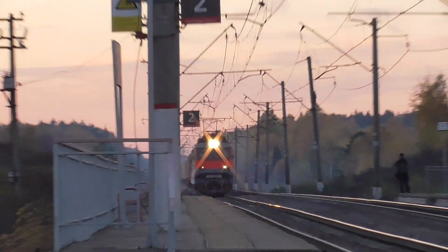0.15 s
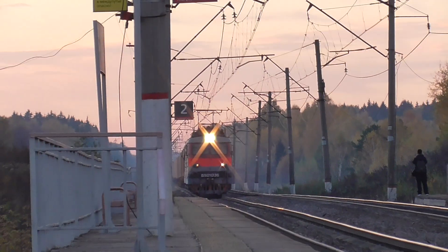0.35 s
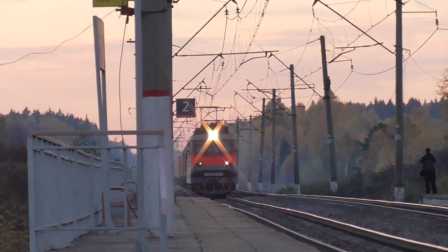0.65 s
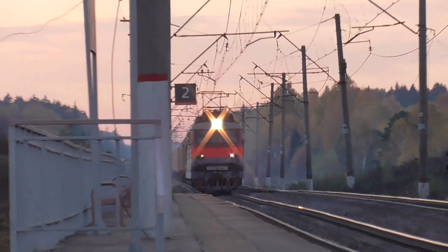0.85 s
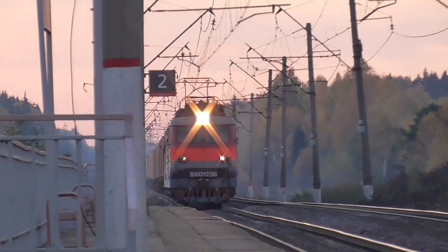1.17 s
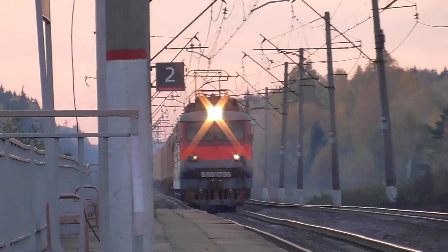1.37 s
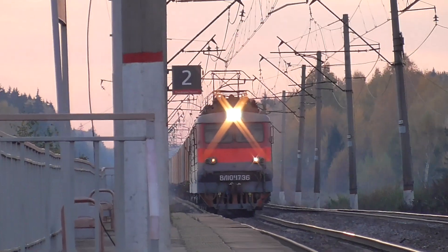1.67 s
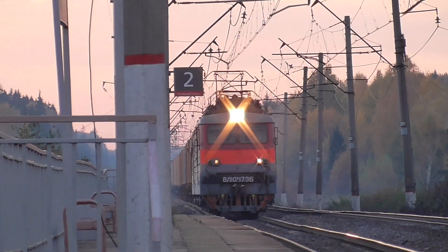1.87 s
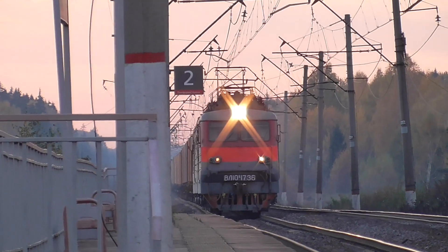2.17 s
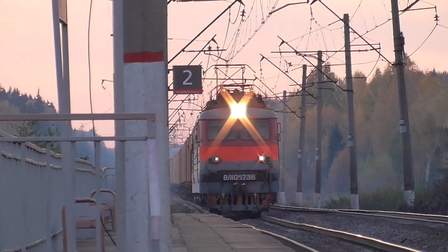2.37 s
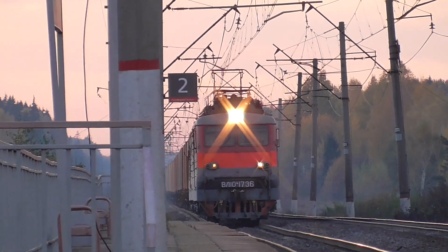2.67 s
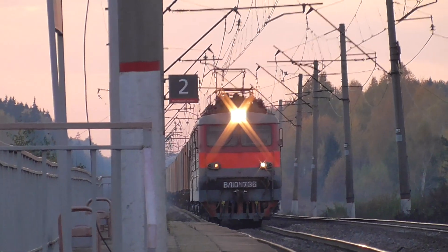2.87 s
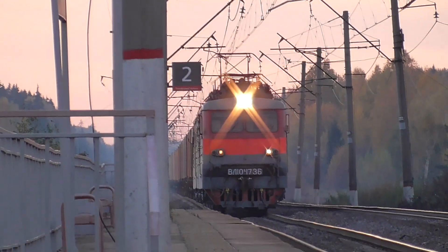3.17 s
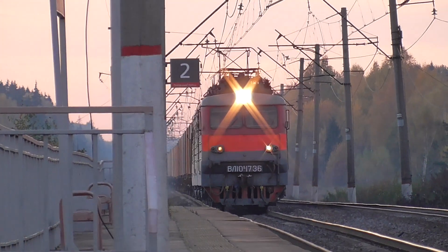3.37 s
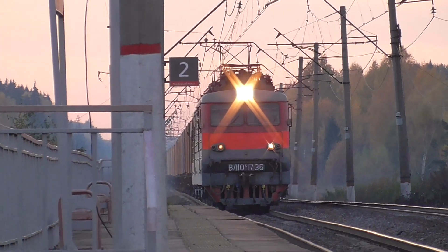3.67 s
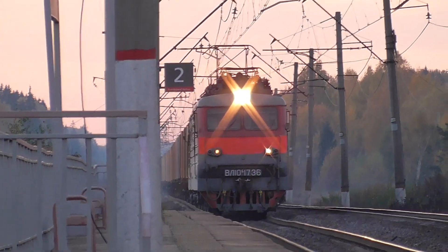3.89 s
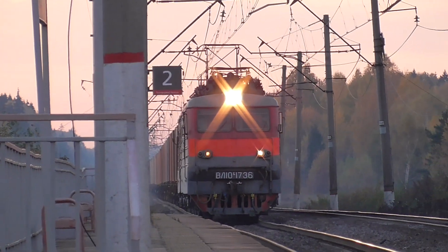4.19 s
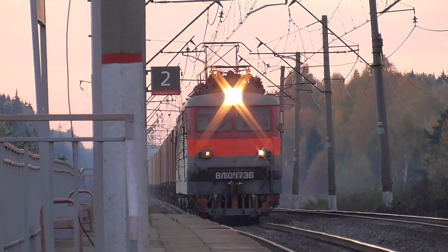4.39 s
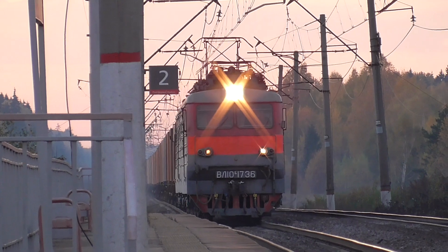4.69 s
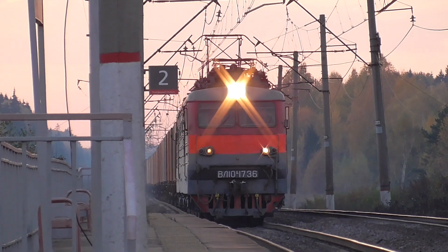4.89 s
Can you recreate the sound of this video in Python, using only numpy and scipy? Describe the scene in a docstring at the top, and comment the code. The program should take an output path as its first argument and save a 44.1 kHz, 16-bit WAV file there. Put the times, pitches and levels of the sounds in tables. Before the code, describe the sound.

An electric freight train rumbles far off in a wooded valley while, right at the microphone, a camera's motors faintly whine, tick and sizzle. After about two seconds the approaching locomotive sounds a loud high air horn, joined a moment later by a lower one. Both hold, wavering, with rough echoes from the trees. Near the end the high horn drops to a weak tail and the low one sags slightly.

```python
"""An electric freight train rumbles far off in a wooded valley, while close by a camera's motors whine,
tick and sizzle. After two seconds the approaching locomotive sounds its high air horn, then its low one:
in each, compressed air drives a diaphragm that radiates a harmonic series. Trees that the train has passed
return the horns late and at a lower Doppler pitch, which hangs a rough band under every partial.
Near the end the valve is let go: the high horn drops to a weak tail, the low one sags and dulls."""
import sys
import numpy as np
from scipy import signal
from scipy.fft import rfft, irfft, next_fast_len
from scipy.io import wavfile
from scipy.ndimage import uniform_filter1d

SR = 44100
rng = np.random.default_rng(int(sys.argv[2]) if len(sys.argv) > 2 else 0)


def generate_wav(signal):
    """Clip the signal to [-1, 1] and save it as 16-bit WAV at the path in sys.argv[1]."""
    frames = np.transpose(np.atleast_2d(signal))
    scaled = np.clip(frames, -1, 1) * 32767
    pcm = np.round(scaled).astype(np.int16)
    wavfile.write(sys.argv[1], SR, pcm)


N = 222043
TIME = np.arange(N) / SR
TRAIN_M_PER_S, SOUND_M_PER_S, START_RANGE_M = 21.5, 335, 200
HIGH_ON_S, LOW_ON_S, MID_BLAST_S, VALVE_OFF_S = 2.157, 2.475, 3.4, 4.58
CYCLE_S = .2833   # period of the camera mechanism


def from_db(db):
    """Decibels to amplitude ratio."""
    return 10 ** (np.asarray(db) / 20)


def unit_rms(x):
    """Normalisation to unit power."""
    return x / np.sqrt(np.mean(x ** 2) + 1e-20)


def since(s):
    """Seconds elapsed since a moment; zero before it."""
    return np.maximum(TIME - s, 0)


def rise(s, length_s):
    """A linear ramp from 0 to 1 that starts at s."""
    return np.minimum(since(s) / length_s, 1)


def pulse(s, width_s, clock=TIME):
    """A Gaussian pulse centred on s."""
    return np.exp(-.5 * ((clock - s) / width_s) ** 2)


def phase_of(hz):
    """Phase is the time integral of frequency."""
    return 2 * np.pi * np.cumsum(hz) / SR


def drift(hz):
    """A random fluctuation of unit rms, low-passed at hz."""
    pole = np.exp(-200 * np.pi * hz / SR)
    white = rng.standard_normal(N // 100 + 1002)
    slow = signal.lfilter([1], [1, -2 * pole, pole * pole], white)[1000:]
    return np.interp(np.arange(N) / 100, np.arange(len(slow)), unit_rms(slow))


def noise(spectrum):
    """Spectral shaping: noise of unit rms that falls 12 dB an octave beyond the given points."""
    hz, db = np.transpose(spectrum)
    size = 2 * next_fast_len(N // 2 + 1)
    bins = np.maximum(np.arange(size // 2 + 1) * SR / size, 1)
    colour = from_db(np.interp(np.log(bins), np.log(hz), db))
    skirts = np.minimum(1, bins / hz[0]) ** 2 * np.minimum(1, hz[-1] / bins) ** 2
    return unit_rms(irfft(rfft(rng.standard_normal(size)) * colour * skirts, size)[:N])


def partials(phase, harmonics, flutter_db):
    """A harmonic series in which air turbulence modulates each partial independently."""
    return sum(from_db(db + flutter_db * drift(13.7)) * np.sin(k * phase) for k, db in harmonics)


# Rolling noise spectrum. Each row: frequency in Hz, relative density in dB.
ROLLING_SPECTRUM = [(15, -49), (25, -10), (63, -9.5), (157, 2), (366, -8), (477, -3.5), (727, -15),
                    (1260, -15.5), (1760, -28.5), (2630, -28.5), (2810, -35), (3430, -28), (3670, -38.5),
                    (4380, -42.5), (5000, -51), (6500, -99.5), (11000, -120)]
# Its envelope. Each row: time in seconds, level in dB.
ROLLING_LEVELS = [(0, -39.5), (.6, -39.5), (1.3, -41), (2.15, -40), (2.4, -42), (3.6, -43), (4.7, -42),
                  (5.03, -37.5)]
# Low drones. Each row: centre and length in seconds, centre pitch in Hz, glide in Hz/s, level in dB.
ROLLING_DRONES = [(0.586, 0.16, 102, 1.5, -43), (1.367, 0.48, 94, 17, -42.5), (3.718, 1.7, 102, 19, -43.5),
                  (5.0, 0.94, 98, -27.5, -39)]
def rolling():
    """Rolling noise: distant wheels and wagons radiate a broad rumble, and low drones glide through it."""
    level_db = np.interp(TIME, *np.transpose(ROLLING_LEVELS))
    out = from_db(level_db + .44 * drift(3.8)) * noise(ROLLING_SPECTRUM)
    for s, length_s, hz, glide, db in ROLLING_DRONES:
        swell = np.cos(np.pi * np.clip((TIME - s) / length_s, -.5, .5))
        gain = from_db(db + 1.5 * drift(1.8)) * swell
        out += gain * np.sin(phase_of(hz + glide * (TIME - s) + drift(13)))
    return out


# Motor tones. Each row: frequency in Hz, level in dB, depth of the dip from 0 to 1.
MOTOR_TONES = [(3363, -51.5, .25), (4220, -61, .85), (6762, -66.5, .95), (7620, -71.5, .3),
               (9365, -69.5, .9), (9698, -76, .6)]
def motor_whine():
    """Amplitude modulation: the camera motor's tones dip once a cycle and swell once in three."""
    dip = pulse(.047, .013, TIME % CYCLE_S)
    swell_db = -3 * np.cos(2 * np.pi * TIME / (3 * CYCLE_S))
    out = np.zeros(N)
    for hz, db, depth in MOTOR_TONES:
        phase = phase_of(hz * (1 + .0012 * drift(46)))
        out += from_db(db + (1 - depth) * swell_db + drift(5)) * (1 - depth * dip) * np.sin(phase)
    return out


# Rattle spectrum. Each row: frequency in Hz, relative density in dB.
RATTLE_SPECTRUM = [(7900, -28), (8300, 8), (8600, -13), (9200, 3), (9350, 11), (9520, -6), (9750, 11.5),
                   (9900, -29.5)]
def rattle():
    """Modulated band noise: the camera mechanism rattles faintly, four throbs to a cycle."""
    throb = 1 + .8 * np.cos(8 * np.pi * TIME / CYCLE_S)
    return from_db(-73) * throb * noise(RATTLE_SPECTRUM)


# Zoom drive spectrum. Each row: frequency in Hz, relative density in dB.
ZOOM_SPECTRUM = [(3000, -3), (6000, -5), (12000, -7)]
def zoom_rustle():
    """Broadband machine noise: the zoom drive rustles briefly and stops."""
    return from_db(-68.5) * (1 - rise(.29, .05)) * noise(ZOOM_SPECTRUM)


# Hiss spectrum. Each row: frequency in Hz, relative density in dB.
HISS_SPECTRUM = [(3000, -3.5), (6000, -6.5), (7700, -0.5), (9300, 2), (10200, -4), (12000, -7.5),
                 (13000, 3.5), (15800, -4)]
def hiss():
    """Stationary noise: the microphone's own hiss."""
    return from_db(-66.5) * noise(HISS_SPECTRUM)


# Mechanism ticks. Each row: time within the cycle in seconds, peak level in dB.
CYCLE_TICKS = [(0.012, -53.5), (0.095, -53.5), (0.164, -65.5), (0.247, -56.5)]
def ticks():
    """Resonance: the camera mechanism rings briefly at one pitch with every tick."""
    envelope = sum(from_db(db) * pulse(s, .004, TIME % CYCLE_S) for s, db in CYCLE_TICKS)
    return envelope * np.sin(2 * np.pi * 2605 * TIME)


# Lens motor runs. Each row: start in seconds, end in seconds, relative level in dB.
LENS_BURSTS = [(0.636, .71, -55), (1.652, 1.86, -49.5), (1.94, 2.067, -52), (2.884, 2.92, -52),
               (2.955, 3.334, -49), (4.08, 4.27, -46), (4.277, 4.38, -50)]
# Their spectrum. Each row: frequency in Hz, relative density in dB.
LENS_SPECTRUM = [(10000, -45), (11800, -26.5), (12800, -4.5), (14000, -6), (14700, 0), (15800, -4)]
def lens_sizzle():
    """Gated noise: the lens motor sizzles unevenly while it runs."""
    gate = sum(from_db(db) * ((TIME > start) & (TIME < end)) for start, end, db in LENS_BURSTS)
    return uniform_filter1d(gate, size=1400) * from_db(1.8 * drift(70) - 3.5) * noise(LENS_SPECTRUM)


# Small clicks close by. Each row: start in seconds, level in dB, centre frequency in Hz.
NEAR_CLICKS = [(.777, -56, 4300), (3.372, -66, 11000)]
def clicks(decay_s=.0049):
    """Damped transients: each click is a narrow band of noise that decays exponentially."""
    out = np.zeros(N)
    for s, db, hz in NEAR_CLICKS:
        band = signal.butter(2, [hz * .87, hz * 1.15], "band", fs=SR, output="sos")
        envelope = (TIME > s) * np.exp(-since(s) / decay_s)
        out += from_db(db) * envelope * unit_rms(signal.sosfilt(band, rng.standard_normal(N)))
    return out


# Reflections of the high horn. Each row: harmonic number, first swell in seconds, beat rate in Hz,
# slowing in Hz/s, amplitude as a share of the direct sound.
HORN_REFLECTIONS = [(1, 2.24, 2.7, .45, .55), (1, 2.23, 6.4, 1.4, .42), (2, 2.25, 3.1, .3, .27),
                    (2, 2.16, 1.0, 1.15, .25), (3, 2.32, 1.85, 1.05, .5), (5, 2.22, 1.85, 1.95, .45)]
def beating(harmonic):
    """Interference: the gain of a partial as its reflections move in and out of step with it."""
    total = 1
    for k, first_s, rate, slowing, share in HORN_REFLECTIONS:
        if k == harmonic:
            t = TIME - first_s
            total += share * np.exp(2j * np.pi * (rate * t - .5 * slowing * t ** 2))
    return np.abs(total)


def fading(scattered, hz, build_s=1):
    """Multipath fading: scattered copies of a tone give its gain broad tops and sharp dips."""
    share = scattered * rise(HIGH_ON_S, build_s)
    return np.hypot(1 + share * drift(hz), share * drift(hz)) / np.sqrt(1 + 2 * share ** 2)


def high_fundamental(phase, release_s=.37):
    """The diaphragm's fundamental passes through a broad lull and decays exponentially on release."""
    level_db = -25.5 + .8 * (TIME - MID_BLAST_S) - 10 * pulse(3.22, .18)
    envelope = from_db(level_db) * np.exp(-since(VALVE_OFF_S) / release_s)
    return envelope * beating(harmonic=1) * fading(scattered=.33, hz=12.5) * np.sin(phase)


# The high horn's sideways radiation. Each row: harmonic number, relative level in dB.
HIGH_SIDEWAYS = [(1, -33), (2, -45.5), (3, -56), (4, -62), (5, -67), (6, -69), (7, -77)]
def high_horn(heard_hz=797.1, overshoot_hz=13, settle_s=.085, release_s=.027, tail_s=.68):
    """Directivity: the horn, starting sharp, sends one spectrum ahead and another sideways."""
    hz = heard_hz + overshoot_hz * np.exp(-since(2.19) / settle_s)
    phase = phase_of(hz + .2 * drift(20))
    opened, released, tail = rise(HIGH_ON_S, .024), since(VALVE_OFF_S), from_db(-23.5)
    blow = opened * ((1 - tail) * np.exp(-released / release_s) + tail * np.exp(-released / tail_s))
    fundamental = opened * high_fundamental(phase)
    brassy = rise(2.172, .025)   # overtones come once the diaphragm slaps shut
    overtones = high_brass(phase) + high_treble(phase, hz) + croak(phase) + air_jet()
    ahead = fundamental + blow * (brassy * overtones + cab_rebound(phase))
    return ahead, blow * partials(phase, HIGH_SIDEWAYS, flutter_db=2)


def cab_rebound(phase):
    """Doppler shift: sound thrown back onto the moving cab front reflects again and comes out sharp."""
    echoes = sum((1 + .5 * drift(4)) * np.sin(ratio * phase + .7 * drift(3))
                 for ratio in np.linspace(1.099, 1.106, 4))
    return from_db(-52.5 + 5 * (TIME - 3.7)) * echoes


# The high horn's lower overtones. Each row: harmonic number, relative level at mid-blast in dB,
# growth in dB/s, scattered share.
BRASS_HARMONICS = [(2, -33.5, 1.55, 0.31), (3, -38, 3.1, 0.66), (4, -36.5, -0.3, 0.14),
                   (5, -51.5, -3.5, 0.41)]
def high_brass(phase):
    """Multipath propagation: the lower overtones fade in and out in the moving air."""
    out = np.zeros(N)
    for k, db, growth, scattered in BRASS_HARMONICS:
        gain = from_db(db + growth * (TIME - MID_BLAST_S))
        out += gain * beating(k) * fading(scattered, hz=8.8) * np.sin(k * phase)
    return out


# Its upper overtones. Each row: harmonic number, relative level in dB.
TREBLE_HARMONICS = [(6, -53.5), (7, -61), (8, -62.5), (9, -64.5), (10, -66), (11, -72.5), (12, -73),
                    (13, -83), (14, -85)]
def high_treble(phase, hz, loss_db_per_m=.27):
    """Air absorption goes with frequency squared, so the top partials grow as the train nears."""
    nearer_m = TRAIN_M_PER_S * (TIME - 3.7)
    out = np.zeros(N)
    for k, db in TREBLE_HARMONICS:
        regained_db = loss_db_per_m * nearer_m * (k * hz / 10000) ** 2   # loss is given at 10 kHz
        flutter_db = min(.35 * k, 2.3) * drift(6)
        out += from_db(db + regained_db + flutter_db) * np.sin(k * phase)
    return out


# Air jet spectrum. Each row: frequency in Hz, relative density in dB.
JET_SPECTRUM = [(800, 6), (2200, -8), (3600, -8.5), (4700, -11), (5300, -24), (8000, -24.5), (12000, -41)]
def air_jet():
    """Flow noise: the jet of air hisses in the high horn."""
    return from_db(-54.5) * noise(JET_SPECTRUM)


# Half-order partials. Each row: multiple of the fundamental, relative level in dB.
CROAK_PARTIALS = [(.5, -34), (1.5, -49), (2.5, -42), (3.5, -48), (4.5, -53), (5.5, -52)]
def croak(phase):
    """Period doubling: the diaphragm starts with every other beat stronger."""
    envelope = pulse(2.195, .017) * from_db(2 + 4.9 * drift(88))
    return envelope * sum(from_db(db) * np.sin(k * phase) for k, db in CROAK_PARTIALS)


def forest_echoes(sideways, near_m, far_m, trees):
    """Doppler shift: the path by way of a tree already passed grows, so its echo is lower in pitch."""
    coarse_s = TIME[::100]
    train_m = START_RANGE_M - TRAIN_M_PER_S * coarse_s
    out, power = np.zeros(N), 0
    # golden-ratio steps mix near and far trees evenly along the line
    depths = (rng.random() + np.arange(trees) * (np.sqrt(5) - 1) / 2 + .15 * rng.random(trees)) % 1
    for along_m, depth in zip(np.linspace(70, 340, trees), depths):
        across_m = near_m * (far_m / near_m) ** depth
        outward_m = np.hypot(train_m - along_m, across_m)
        delay_s = (outward_m + np.hypot(along_m, across_m) - train_m) / SOUND_M_PER_S
        arrival_s = coarse_s + delay_s
        spreading = outward_m ** -.9
        sent_s = TIME - np.interp(TIME, arrival_s, delay_s)
        out += np.interp(TIME, arrival_s, spreading) * np.interp(sent_s, TIME, sideways)
        power += np.mean(spreading[len(spreading) // 2:] ** 2)
    return out / np.sqrt(power)


# The low horn's radiation ahead, then sideways. Each row: harmonic number, relative level in dB.
LOW_FORWARD = [(2, -36), (3, -48.5), (4, -54), (5, -65.5), (6, -59), (7, -78.5), (8, -69.5), (9, -67)]
LOW_SIDEWAYS = [(1, -37.5), (2, -39.5), (3, -44), (4, -54), (5, -61), (6, -60.5), (7, -67), (8, -95),
                (9, -63), (10, -75), (11, -66.5), (12, -76)]
def low_horn(heard_hz=393.5, sag_hz_per_s=12.93, dulling_per_s=.14):
    """Nonlinear vibration: a nearly pure tone turns brassy as pressure builds, and dulls on release."""
    released = since(VALVE_OFF_S)
    phase = phase_of(heard_hz - sag_hz_per_s * released + .725 * drift(13.04))
    blow = rise(LOW_ON_S, .12)
    brassy = np.clip(rise(LOW_ON_S, .16) - dulling_per_s * released, 0, 1)
    rush_db = 8.5 * np.exp(-(since(LOW_ON_S) / .69) ** 2)   # the first rush of air is louder
    ahead = from_db(-39 + rush_db) * fading(scattered=.37, hz=14) * np.sin(phase)
    ahead += brassy ** 2 * from_db(3.5) * partials(phase, LOW_FORWARD, flutter_db=3.5)
    sideways = partials(phase, LOW_SIDEWAYS[:1], flutter_db=1.5)
    sideways += brassy * partials(phase, LOW_SIDEWAYS[1:], flutter_db=6)
    return blow * ahead, blow * from_db(-1.5) * sideways


def scene():
    """Superposition: the train, the camera, and the horns heard directly and by way of the trees."""
    high_ahead, high_sideways = high_horn()
    low_ahead, low_sideways = low_horn()
    echoes = forest_echoes(high_sideways + low_sideways, near_m=14, far_m=95, trees=80)
    horns = from_db(5.5) * (high_ahead + low_ahead + from_db(-1) * echoes)
    train = rolling()
    camera = motor_whine() + ticks() + rattle() + lens_sizzle() + zoom_rustle() + clicks() + hiss()
    return (train + camera + horns)[None]


def gain_control(x, threshold_db, slope, release_db_per_s):
    """Compression: loud sound turns the gain down at once, and it creeps back."""
    level_db = 10 * np.log10(np.maximum(uniform_filter1d(x[0] ** 2, size=900), 1e-12))
    held_db = np.maximum.accumulate(level_db + release_db_per_s * TIME) - release_db_per_s * TIME
    return x * from_db(-slope * np.maximum(held_db - threshold_db, 0))


def record(dry, cutoff_hz=15750):
    """Compression, then band limiting by a steep low-pass filter."""
    held = gain_control(dry, threshold_db=-29, slope=.23, release_db_per_s=22.5)
    return signal.sosfilt(signal.ellip(12, .1, 80, cutoff_hz, fs=SR, output="sos"), held)


dry = scene()
out = record(dry)
generate_wav(out)
```